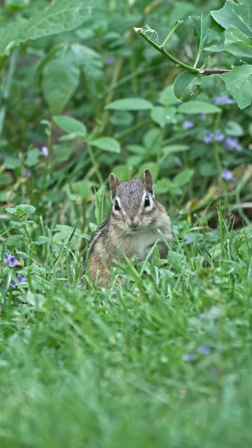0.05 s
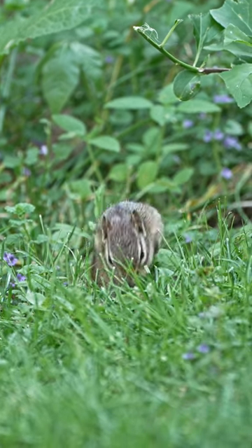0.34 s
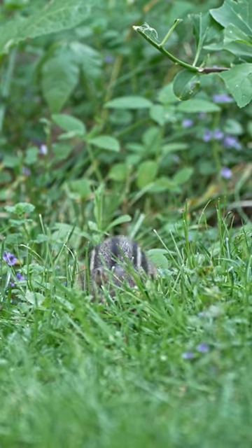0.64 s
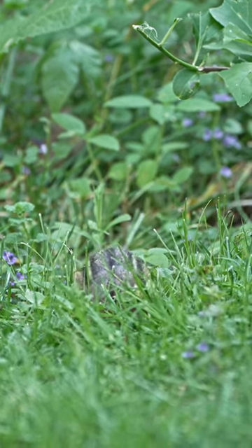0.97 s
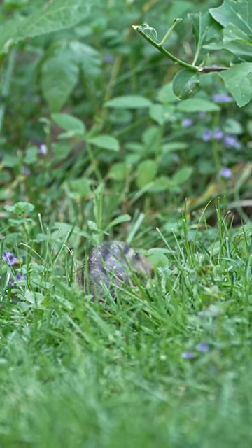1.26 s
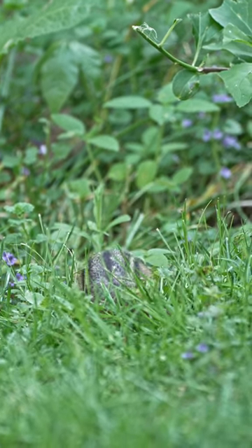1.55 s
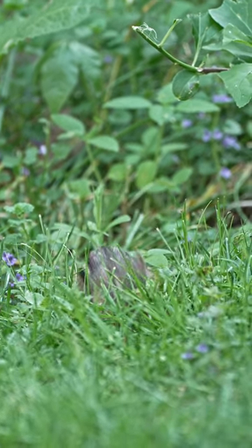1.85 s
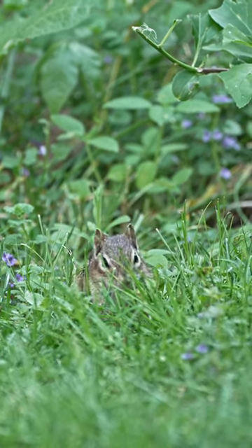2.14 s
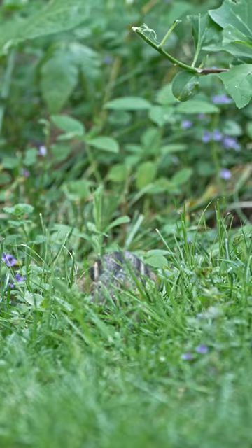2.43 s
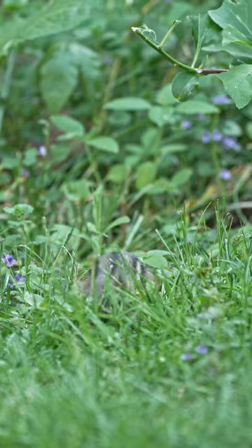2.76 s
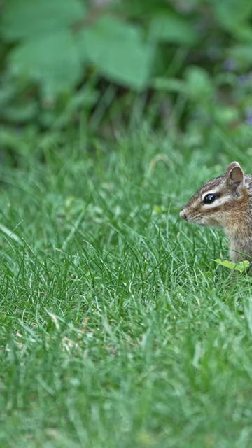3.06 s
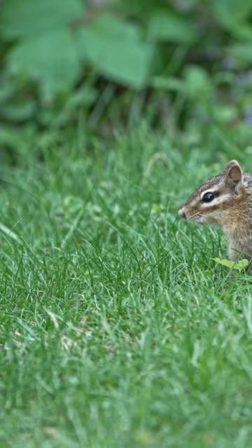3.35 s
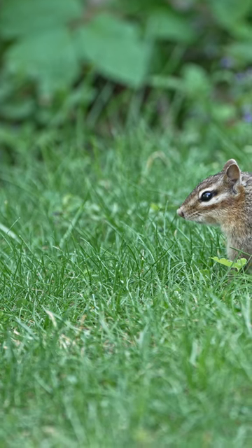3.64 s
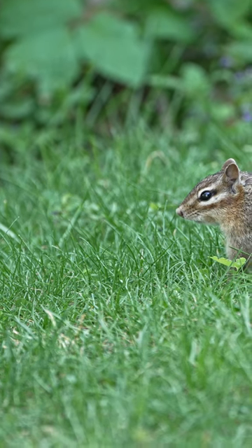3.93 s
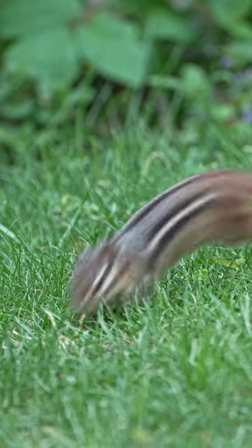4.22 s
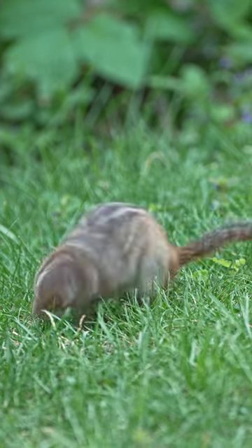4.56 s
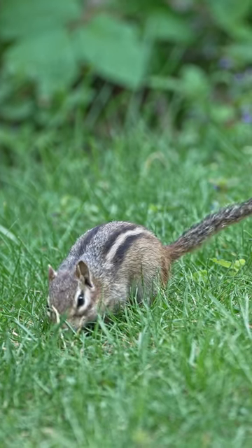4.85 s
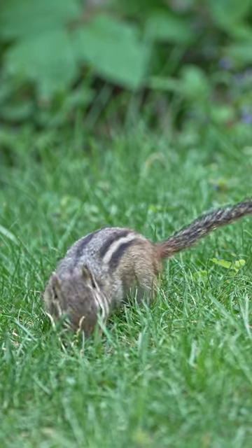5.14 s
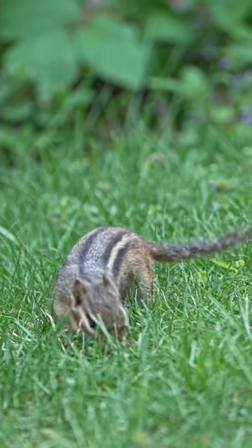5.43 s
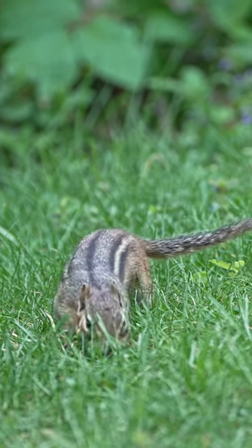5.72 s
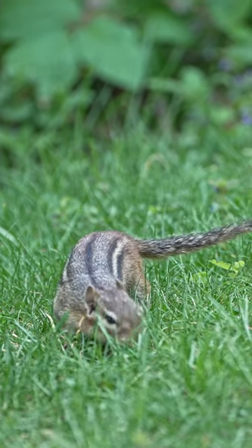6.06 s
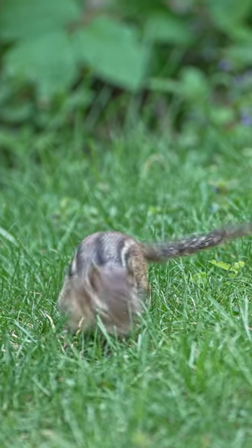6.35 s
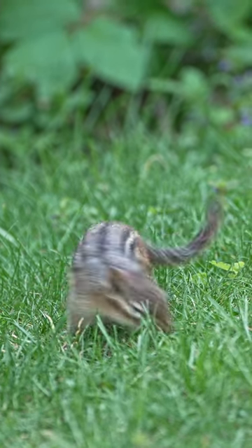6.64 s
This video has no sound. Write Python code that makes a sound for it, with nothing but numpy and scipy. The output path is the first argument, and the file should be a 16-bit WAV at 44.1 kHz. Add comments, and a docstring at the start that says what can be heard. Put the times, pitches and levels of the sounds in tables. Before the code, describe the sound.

A songbird close to the microphone sings a loose, varied string of chirps, sliding whistles, short buzzes and nasal mews at the edge of a garden. Early on, a second bird further away repeats a quick run of faint falling notes. The near bird follows with bright rising whistles, a hoarse squawk and more chirps. Trees add a short echo, and distant traffic rumbles softly throughout.

```python
"""A catbird-like songbird runs through whistles, sweeps, buzzes and nasal mews at the edge of a garden.
Each note is a syrinx oscillation shaped by the throat; in the last, both sides of the syrinx sound.
Trunks and leaves scatter the song into a short tail. A second bird repeats falling slurs
further off, over a low rumble of distant traffic."""
import sys
import numpy as np
from scipy import signal
from scipy.fft import rfft, irfft
from scipy.io import wavfile
from scipy.ndimage import uniform_filter1d

SR = 44100
rng = np.random.default_rng(int(sys.argv[2]) if len(sys.argv) > 2 else 0)


def unload_wav(signal):
    """Save mono or channel-first audio to the path in sys.argv[1] as 16-bit WAV at rate SR, clipped to [-1, 1]."""
    wavfile.write(
        sys.argv[1],
        SR,
        np.round(np.clip(np.atleast_2d(signal).T, -1, 1) * 32767).astype(np.int16),
    )


N = 295029
T = np.arange(N) / SR
PROGRESS = np.linspace(0, 1, 101)  # control points along a note


def near_bird(beam_hz=7200):
    """One perch. Overtones and top notes leave the beak in a narrow beam and arrive mostly as echoes."""
    voice, overtones = whistles() + buzzes()
    voice += short_mews() + long_mews()
    add(voice, 6.582, two_voices())
    hz = np.arange(N // 2 + 1) * SR / N + 1
    beam_share = .85 / (1 + (beam_hz / hz) ** 6)
    wide, beamed = (irfft(rfft(voice) * np.sqrt(power), N) for power in (1 - beam_share, beam_share))
    scattered = trees(overtones + beamed, direct_db=-14, early_db=-1, late_db=-12, early_t60_s=.22)
    return trees(wide, direct_db=-.7, early_db=-5, late_db=-14) + scattered


# Sliding whistles: (start [s], length [s], slide after [s], slide time [s], from before sag [Hz],
#   to before sag [Hz], level at slide [dB], fade [dB], overtone [dB])
SLIDES = [ (0.089, .036, .025, 0.0068, 2020, 2880, -19.5, 5, -21),
          (2.439, 0.098, .047, .012, 6820, 5980, -14.5, 2, -25.5),
          (2.554, .068, .029, .012, 4000, 5098, -7, 9, -26),
          (2.639, 0.066, .032, .015, 3726, 5065, -2, 14, -29.5),
          (2.734, .054, .044, 0.0049, 6650, 8870, -8, 20, -21),
          (3.021, 0.05, 0.039, .01, 2048, 1603, -16, 9.5, -22),
          (3.072, 0.046, .011, .009, 1603, 3168, -16, 0, -28.5),
          (4.72, 0.14, .056, 0.019, 7180, 5710, -20.5, 4, -25),
          (4.907, 0.058, .035, .012, 8150, 9100, -26.5, 10, -40),
          (4.965, 0.039, .017, .01, 8970, 6750, -28.5, -1, -40),
          (5.34, 0.084, .014, .024, 4400, 2700, -20.5, 8, -24),
          (5.512, 0.088, 0.00695, .013, 3454, 2900, -25, -3, -16),
          (5.723, .104, .014, 0.011, 2520, 2360, -25, 10, -24),
          (6.047, 0.15, .087, 0.0092, 8420, 6560, -22, -6.5, -27),
          (6.447, .047, .018, .015, 850, 3390, -25, 3, -20),
          (6.493, .088, .016, 0.0096, 3350, 1758, -12, 15.5, -26.5),
          (6.531, .072, 0.052, .015, 3330, 4310, -20, 5, -27), ]
# Arched or dipping chirps: (start [s], length [s], turn after [s], from [Hz], turn [Hz], to [Hz],
#   level at turn [dB], fade [dB], overtone [dB])
CHIRPS = [ (.124, .03, .008, 2870, 1700, 2880, -33, -4, -30),
          (.16, 0.067, .02, 1670, 2096, 1750, -18.5, 17, -27.5),
          (2.791, 0.0225, 0.0178, 8800, 8320, 8280, -21.5, 0, -21),
          (3.02, .016, .009, 2100, 2740, 2097, -24.5, 1, -29),
          (3.163, 0.037, .016, 1015, 1358, 796, -26, 10, -3),
          (5.178, .018, .016, 1600, 3000, 3020, -38, 0, -25),
          (5.192, .048, .02, 1940, 1870, 1980, -29.5, 18, -23),
          (5.257, .064, 0.017, 3290, 1720, 4360, -28, 13, -26),
          (5.62, .055, .02, 2787, 2740, 2805, -24, 19, -7.5),
          (6.401, .024, .018, 1060, 1110, 1200, -34, 2, 3),
          (6.424, .022, .009, 1900, 990, 950, -29, 14, -6),
          (6.414, .016, 0.0089, 1286, 2250, 1750, -29, 3, -25), ]
# Long falling whistle: (time [s], pitch [Hz], relative level [dB])
LONG_WHISTLE = [(1.664, 5389, -26.5), (1.674, 4742, -28), (1.682, 4290, -13), (1.696, 3820, -9),
                (1.714, 3489, -6), (1.73, 3300, -11), (1.736, 3242, -6.5), (1.746, 3220, -11.5),
                (1.788, 3134, -12.5), (1.944, 3038, -20), (2.02, 3047, -17.5), (2.08, 3043, -32)]

def whistles():
    """Near-pure syrinx notes: slides, chirps and one long fall. Returns (fundamental, overtones)."""
    out = np.zeros((2, N))
    for *note, overtone_db in SLIDES:
        add(out, note[0], whistle(slide(*note), overtone_db, jitter=.0049))
    for *note, overtone_db in CHIRPS:
        add(out, note[0], whistle(arch(*note), overtone_db, jitter=.0066))
    add(out, LONG_WHISTLE[0][0], undb(-1) * whistle(LONG_WHISTLE, overtone_db=-29))
    return out


# Buzzed slides: (start [s], length [s], slide after [s], slide time [s], from [Hz], to [Hz],
#   level at slide [dB], fade [dB], swing rate [Hz], swing depth [share of pitch])
BUZZES = [ (.325, 0.16, .06, .055, 3060, 2000, -23, 10, 65.1, .062),
          (3.637, 0.16, .038, .034, 2750, 4740, -18.5, 1, 79.9, .058),
          (5.418, .13, .038, .02, 1836, 2510, -25.5, 1, 84.5, 0.073), ]

def buzzes():
    """A fast pitch swing turns a whistle into a buzz. Returns (fundamental, overtones)."""
    out = np.zeros((2, N))
    for *note, swing_hz, depth in BUZZES:
        curve = slide(*note, swell_db=13, sag_per_s=0)
        add(out, note[0], whistle(curve, overtone_db=-24, swing_hz=swing_hz, depth=depth, jitter=.04))
    return out


# Short nasal calls: (start [s], length [s], turn after [s], from [Hz], turn [Hz], to [Hz],
#   level at turn [dB], fade [dB], throat from [Hz], throat to [Hz], opening [s], first hoarseness [-],
#   last hoarseness [-], throat half-width [Hz], odd harmonics [dB], beak cut-off / throat [ratio])
SHORT_MEWS = [ (.287, 0.13, .036, 1348, 1469, 1260, -17, 20, 4200, 5430, 0.0846, 0.021, 1.13, 168, -5.5, 1.9),
              (1.163, 0.0604, .027, 1824, 2069, 2007, -15, 11, 3980, 4450, 0.036, 0.42, 0.32, 890, -2, 1.72),
              (2.087, .058, .021, 720, 2000, 500, -20, 15, 2100, 4060, .02, .3, .6, 1500, -9, 1.36),
              (3.258, .087, .035, 1950, 2316, 2250, -21.5, 6, 3580, 5040, 0.038, .6, 1.01, 1000, 1, 1.57),
              (5.708, 0.023, 0.021, 657, 1300, 1310, -26.5, 3, 1000, 2560, 0.025, 0.13, .1, 475, -18, 1.43),
              ]

def short_mews():
    """Pitch arches while the throat opens; hoarseness follows the opening."""
    out = np.zeros(N)
    for call in SHORT_MEWS:
        from_hz, to_hz, open_s, first_hoarse, last_hoarse, *timbre = call[8:]
        curve = arch(*call[:8])
        t = curve[:, 0] - call[0]
        opening = np.sin(np.pi / 2 * np.minimum(t / open_s, 1)) ** 2
        throat_hz = from_hz + (to_hz - from_hz) * opening ** 2
        hoarse = first_hoarse + (last_hoarse - first_hoarse) * opening ** 2
        add(out, call[0], mew(np.c_[curve, throat_hz, hoarse], *timbre))
    return out


# Drawn-out nasal calls: (time [s], pitch [Hz], relative level [dB], throat resonance [Hz])
WHINE = [(0.738, 1327, -23.5, 1270), (0.76, 1199, -25.5, 1250), (0.782, 1257, -22, 1380),
         (0.814, 1334, -21, 3700), (0.844, 1381, -15.5, 4100), (0.94, 1285, -21, 3770),
         (0.984, 1303, -22, 4400), (1.048, 1530, -23.5, 4450), (1.11, 1532, -36.5, 4670)]
SQUAWK = [(4.078, 692.1, -46, 1780), (4.098, 815.2, -28, 1820), (4.12, 916, -21, 1850),
          (4.16, 966.5, -25.5, 1920), (4.178, 909, -26, 1850), (4.206, 995, -24.5, 3500),
          (4.236, 1014, -17.5, 3960), (4.282, 998, -24, 3940), (4.328, 1099, -18, 2670),
          (4.342, 1027, -18.5, 2940), (4.37, 778, -27.5, 2850)]

def long_mews():
    """A whine that grows hoarse and a lower squawk that clears slightly."""
    out = np.zeros(N)

    def sing(curve, gain_db, hoarse_span, **timbre):
        s, hz, db, throat_hz = np.transpose(curve)
        hoarse = np.interp(s, [s[0], s[-1]], hoarse_span)
        add(out, s[0], mew(np.c_[s, hz, db + gain_db, throat_hz, hoarse], **timbre))

    sing(WHINE, gain_db=-2, hoarse_span=(0, 1.45), width_hz=700, odd_db=-1, beak_ratio=1.5)
    sing(SQUAWK, gain_db=-1, hoarse_span=(.64, .47), width_hz=390, odd_db=-6, beak_ratio=1.18)
    return out


# Partials of the two-voiced note: (low voice multiple [-], high voice multiple [-])
PARTIAL_ORDERS = [(1, 0), (2, 0), (0, 1), (1, 1), (2, 1), (-1, 1), (3, 1), (1, 2)]
# Strength of each partial: (relative level [dB])
PARTIAL_DB = [-3.5, 2, -4.5, -2.5, -12, -19, -20, -23]

def two_voices(low_hz=1890, high_hz=3300, length_s=.1, attack_s=.02, settle_s=.03, jitter=.083):
    """Both sides of the syrinx share one airflow and intermodulate; they start sharp and rough."""
    t = PROGRESS * length_s
    strain = np.exp(-t / settle_s)
    sharp = 1 + .075 * strain
    db = -18 - 16 * np.maximum(1 - t / attack_s, 0) - 10.5 * PROGRESS ** 2
    gate, *pitches_hz, db, hoarse = gesture(np.c_[t, low_hz * sharp, high_hz * sharp, db, .91 * strain])
    shaken_hz = [hz * (1 + jitter * hoarse * wander(350, size=len(hz))) for hz in pitches_hz]
    low_phase, high_phase = 2 * np.pi * np.cumsum(shaken_hz, axis=1) / SR
    tone = sum(undb(partial_db) * np.sin(m * low_phase + n * high_phase)
               for (m, n), partial_db in zip(PARTIAL_ORDERS, PARTIAL_DB))
    return gate * undb(db) * tone / tone.std()


def whistle(curve, overtone_db=-35, swing_hz=0, depth=0, jitter=.002, flutter_db=3):
    """A near-sine syrinx oscillation. Returns (fundamental, overtones)."""
    gate, hz, db = gesture(curve)
    n = len(hz)
    rate_hz = swing_hz * (1 + .0626 * wander(26.7, size=n))
    swing = np.sin(2 * np.pi * np.cumsum(rate_hz) / SR)
    hz = hz * (1 + depth * swing + jitter * wander(220, size=n))
    fundamental = syrinx(hz, [1])
    overtones = undb(overtone_db) * syrinx(hz, [0, 1, undb(-14)])
    return gate * undb(db + flutter_db * wander(90, size=n)) * np.array([fundamental, overtones])


def mew(curve, width_hz, odd_db, beak_ratio, jitter=.06, shimmer_db=3.8, chaos_hz=420):
    """A rich oscillation through a moving throat resonance; hoarseness shakes pitch and level."""
    gate, hz, db, throat_hz, hoarse = gesture(curve)
    n = len(hz)
    k = np.arange(1, 13)[:, None]
    throat = 1 / np.hypot(1, (k * hz - throat_hz) / width_hz)
    beak = 1 / np.hypot(1, (k * hz / (beak_ratio * throat_hz)) ** 2.66)
    shaken_hz = hz * (1 + jitter * hoarse * wander(chaos_hz, size=n))
    tone = syrinx(shaken_hz, throat * beak * undb(odd_db * (k % 2)))
    return gate * undb(db + shimmer_db * hoarse * wander(chaos_hz, size=n)) * tone


def syrinx(hz, weights):
    """Weighted harmonics of one oscillation; nominal rms 1."""
    phase = 2 * np.pi * np.cumsum(hz) / SR
    tone = sum(w * (k * hz < SR / 2) * np.sin(k * phase) for k, w in enumerate(weights, 1))
    return tone / np.sqrt(sum(w ** 2 for w in weights) / 2)


def slide(start_s, length_s, after_s, slide_s, from_hz, to_hz, db, fade_db,
          swell_db=33.5, sag_per_s=.331):
    """S-curve between two sagging pitches: (time [s], pitch [Hz], level [dB])."""
    t = PROGRESS * length_s - after_s
    travel = (1 + np.tanh(t / slide_s)) / 2
    hz = (from_hz + (to_hz - from_hz) * travel) * (1 - sag_per_s * t)
    onset_db = swell_db * np.expm1(-after_s / .034)  # earlier slide, smaller swell
    rise_db = onset_db * np.maximum(-t / after_s, 0) ** 1.39
    fall_db = fade_db * np.maximum(t, 0) / t[-1]
    return np.c_[start_s + PROGRESS * length_s, hz, db + rise_db - fall_db]


def arch(start_s, length_s, after_s, from_hz, turn_hz, to_hz, db, fade_db, swell_db=8.5):
    """Two parabolas of pitch meeting at a turn: (time [s], pitch [Hz], level [dB])."""
    t = PROGRESS * length_s
    before = np.maximum(1 - t / after_s, 0)
    after = np.maximum(t - after_s, 0) / max(length_s - after_s, 1e-3)
    hz = turn_hz + (from_hz - turn_hz) * before ** 2 + (to_hz - turn_hz) * after ** 2
    return np.c_[start_s + t, hz, db - swell_db * before ** 2 - fade_db * after]


def gesture(curve, edge_s=.0045):
    """Per-sample controls: a soft gate, then each column after time, rounded by muscle inertia."""
    s, *columns = np.transpose(curve)
    s = np.sort(s)
    t = np.arange(s[0], s[-1] + edge_s, 1 / SR)
    ramp = np.clip(np.minimum(t - t[0], t[-1] - t) / edge_s, 0, 1)
    gate = np.sin(np.pi / 2 * ramp) ** 2
    return [gate] + [uniform_filter1d(np.interp(t, s, c), size=220, mode="nearest") for c in columns]


# Thin far notes: (start [s], length [s], from [Hz], to [Hz], level [dB], fade [dB])
FAR_NOTES = [ (0, .02, 7580, 5600, -40.5, 4), (.66, .04, 2400, 2355, -52, -3),
             (4.58, 0.029, 3980, 4100, -40.5, 16), (4.7, .03, 4150, 4070, -51.5, -5),
             (4.701, 0.456, 2680, 2690, -59, -6), (5.83, .04, 3500, 4000, -50, 2),
             (5.89, .06, 3060, 2990, -44, 11.5), ]

def far_bird(first_s=1.335, period_s=.117, slur_s=.094, top_hz=5850, bottom_hz=3190, lift_hz=55.1):
    """Ten falling slurs and a few thin notes, heard mostly by their echoes."""
    out = np.zeros(N)
    for k, place in enumerate(np.linspace(-1, 1, 10)):
        s = first_s + k * period_s
        hz = top_hz * ((bottom_hz + k * lift_hz) / top_hz) ** PROGRESS
        db = -37 - 9 * place ** 2 + 4 * (1 - PROGRESS) ** 2  # loudest mid-series
        add(out, s, whistle(np.c_[s + slur_s * PROGRESS, hz, db], jitter=.025)[0])
    for s, length_s, from_hz, to_hz, db, fade_db in FAR_NOTES:
        add(out, s, whistle([(s, from_hz, db), (s + length_s, to_hz, db - fade_db)], jitter=.033)[0])
    return trees(out, direct_db=-8, early_db=-3, late_db=-2.5, early_t60_s=.2, late_t60_s=1.1)


def trees(x, direct_db, early_db, late_db, early_t60_s=.26, late_t60_s=.7, leaf_hz=9000):
    """Near trunks and leaves return grainy echoes; the wood beyond adds a duller tail."""
    t = T[:SR]
    onset = np.clip((t - .004) / .002, 0, 1)
    early = rng.standard_normal(SR) * (rng.random(SR) < .04) * onset * undb(-60 * t / early_t60_s)
    late = noise(lambda f: 1 / np.hypot(1, f / leaf_hz), size=SR) * onset * undb(-60 * t / late_t60_s)
    response = undb(early_db) * early / np.linalg.norm(early)
    response += undb(late_db) * late / np.linalg.norm(late)
    response[0] += undb(direct_db)
    return signal.fftconvolve(x, response)[:N]


# Air and traffic spectrum: (frequency [Hz], relative density [dB])
AIR_SPECTRUM = [(25, -4), (48, -6.5), (65, -4), (110, 0), (165, -8), (270, -15), (370, -13.5), (560, -20),
                (1200, -25.5), (2100, -32), (3200, -25), (5400, -34.5), (15500, -38.5)]

def air(level_db=-40.5):
    """Near-steady outdoor air and traffic rumble."""
    hz, db = np.transpose(AIR_SPECTRUM)
    rumble = noise(lambda f: undb(np.interp(np.log(f), np.log(hz), db)))
    return rumble * undb(level_db + .37 * wander(3.3))


# Drone of distant engines: (frequency [Hz], half-width [Hz], level [dB])
DRONE_TONES = [(105, 12.6, -45), (209.8, 7.8, -53)]
# One swelling engine: (frequency [Hz], half-width [Hz], level at peak [dB])
SWELL_TONES = [(145, 13, -49), (207.7, 5.3, -44), (375, 30, -50), (477, 18, -50.5)]

def engines(peak_s=.73, swell_s=.28):
    """Far engines drone; one swells briefly."""
    swell = np.exp(-((T - peak_s) / swell_s) ** 2)
    return hum(DRONE_TONES) + hum(SWELL_TONES) * swell


def hum(tones):
    """Wavering engine tones, blurred by distance."""
    return sum(undb(db) * noise(lambda f: 1 / (1 + ((f - hz) / width_hz) ** 2))
               for hz, width_hz, db in tones)


def undb(db):
    """Decibels to gain."""
    return 10 ** (np.asarray(db) / 20)


def noise(gain, size=N):
    """Noise of rms 1 whose spectrum follows gain(Hz)."""
    hz = np.arange(size // 2 + 1) * SR / size + 1e-3
    x = irfft(rfft(rng.standard_normal(size)) * gain(hz), size)
    return x / x.std()


def wander(hz, size=N):
    """Smooth random motion up to about hz, spread 1."""
    return noise(lambda f: 1 / (1 + (f / hz) ** 4), size=size)


def add(out, start_s, sound):
    """Mix a sound in at a given time."""
    i = max(int(start_s * SR), 0)
    out[..., i:i + sound.shape[-1]] += sound[..., :max(N - i, 0)]


def scene():
    """Both birds over air and engines; mono."""
    return (near_bird() + far_bird() + air() + engines())[None]


def record(dry, cutoff_hz=15700):
    """Soft clip at full scale, then a steep low-pass."""
    rounded = dry / (1 + dry ** 10) ** .1
    return signal.sosfilt(signal.ellip(10, .1, 70, cutoff_hz, fs=SR, output="sos"), rounded)


dry = scene()
out = record(dry)
unload_wav(out)
```